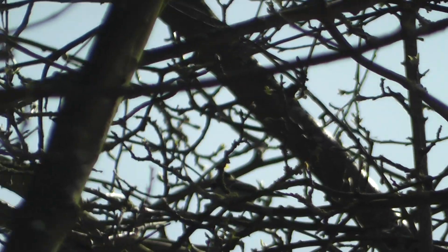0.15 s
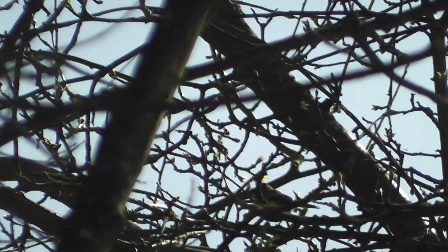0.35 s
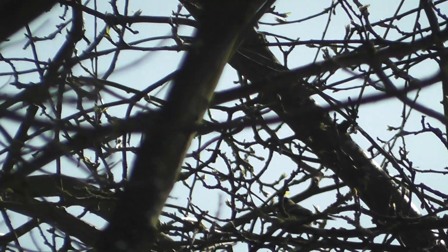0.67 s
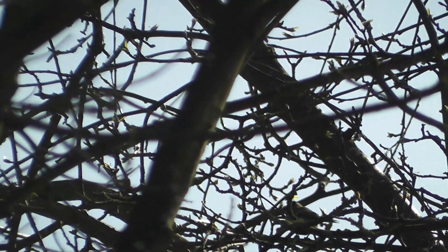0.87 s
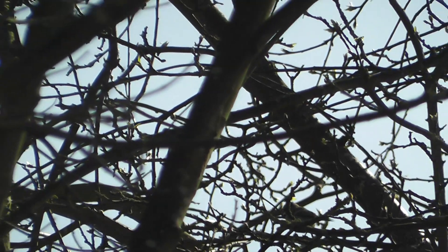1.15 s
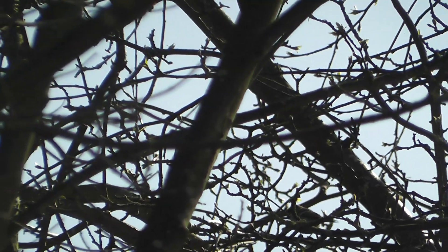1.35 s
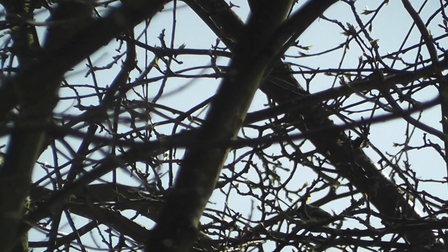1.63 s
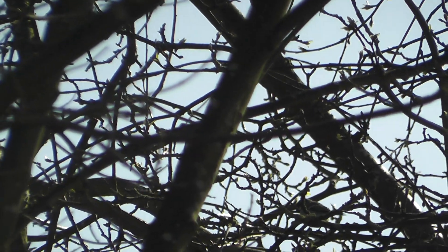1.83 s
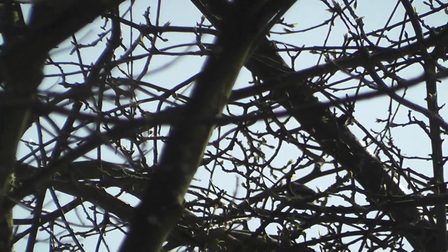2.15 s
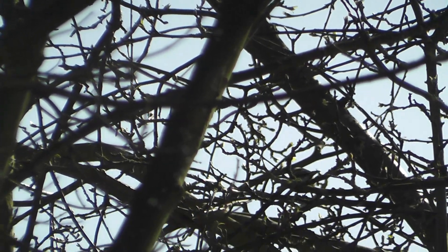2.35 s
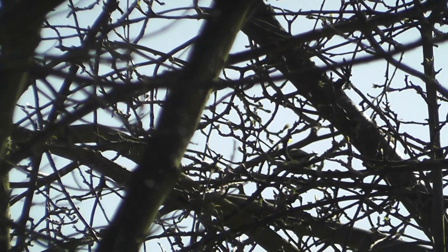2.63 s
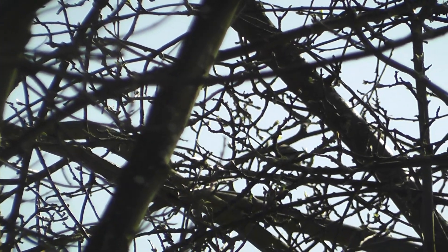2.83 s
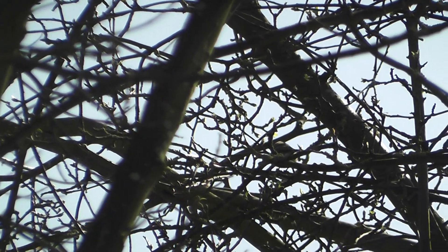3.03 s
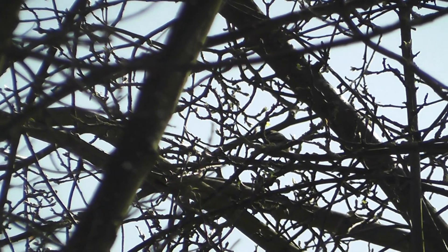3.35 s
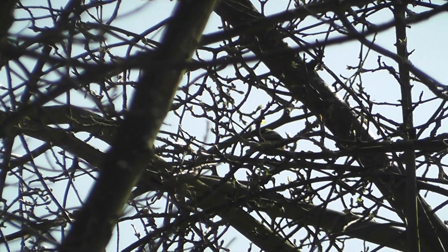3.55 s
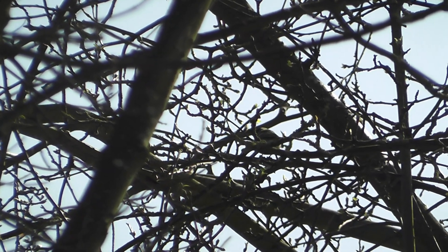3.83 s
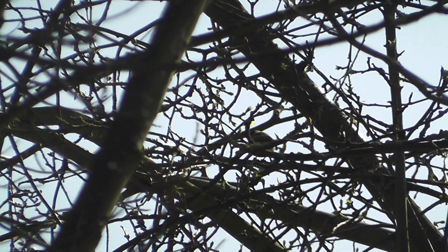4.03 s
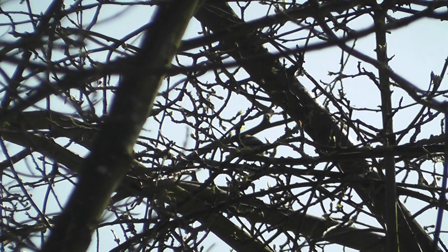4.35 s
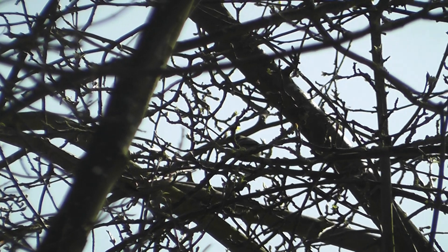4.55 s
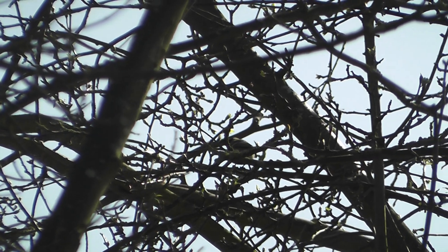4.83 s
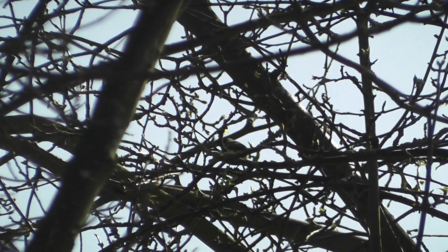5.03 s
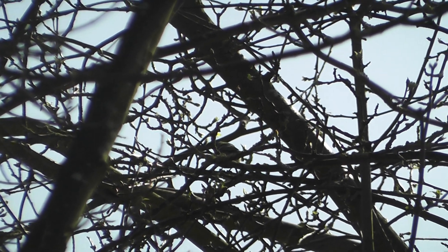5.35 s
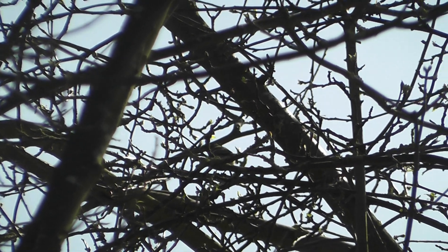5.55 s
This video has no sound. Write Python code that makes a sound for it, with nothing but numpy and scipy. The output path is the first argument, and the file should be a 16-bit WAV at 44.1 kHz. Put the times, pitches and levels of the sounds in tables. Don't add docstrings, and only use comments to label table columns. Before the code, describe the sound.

Among bare trees, a small songbird whistles alternating throbbing high and steady low notes for about a second and a half. A nearby second bird trills, slurs, then chirps quickly and ends in a dry buzz. Faint rival whistles, twitter, a rough throat rattle and dove coos sit far behind. The first bird returns at the end. Stereo microphone at some distance, with woody echoes over a low traffic rumble.

```python
import sys
import numpy as np
from scipy import signal
from scipy.io import wavfile

SR = 44100
rng = np.random.default_rng(int(sys.argv[2]) if len(sys.argv) > 2 else 0)


def master(y):
    cut = np.clip(np.atleast_2d(y).T, -1, 1)
    pcm = np.round(cut * 32767)
    wavfile.write(sys.argv[1], SR, pcm.astype(np.int16))


def level_to_linear(level):
    exponent = np.asarray(level, float) / 20
    return 10 ** exponent


N = 250488
PAD = SR // 4
ALL = N + PAD


def rms_one(x):
    return x / np.sqrt(np.mean(x ** 2) + 1e-20)


def drift(rate_hz, size):
    r = np.exp(-2 * np.pi * rate_hz / SR)
    noise = rng.standard_normal(size + SR)
    return rms_one(signal.lfilter([1], [1, -2 * r, r * r], noise)[SR:])


def add_whistle(out, s, hz, level, overtones):
    phase = 2 * np.pi * np.cumsum(hz) / SR
    at = PAD + round(s * SR)
    tone = np.sin(phase)
    for k, db in overtones:
        tone = tone + level_to_linear(db) * np.sin(k * phase) * (k * hz < SR / 2)
    out[at:at + len(hz)] += (np.sqrt(2) * level * tone)[:ALL - at]


def glides(notes, rise, fall, overtones, late=0., sharp=0.63, sag_hz=0., burr=0., burr_hz=200., rough_db=0.):
    out = np.zeros(ALL)
    wobble = drift(27.2, ALL)
    for s, length, start_hz, end_hz, bend, db in notes:
        u = np.linspace(0, 1, round(length * SR))
        left = (np.exp(-bend * u) - np.exp(-bend)) / (1 - np.exp(-bend))
        hz = end_hz + (start_hz - end_hz) * left - sag_hz * u
        top = np.clip(rise + late * abs(np.log(end_hz / start_hz)), .02, .9)
        opening = np.sin(np.pi / 2 * np.minimum(u / top, 1))
        closing = np.sin(np.pi / 2 * np.minimum((1 - u) / fall, 1))
        add_whistle(out, s, hz, level_to_linear(db) * (opening * closing) ** sharp, overtones)
    throb = 1 + burr * np.sin(2 * np.pi * np.cumsum(burr_hz * (1 + 0.09 * wobble)) / SR)
    return out * throb * level_to_linear(rough_db * drift(140, ALL))


def trees(x, echoes, tail_db, t60, alike, pan_db):
    t = np.arange(3 * PAD) / SR
    decay = level_to_linear(-60 * t / t60) * (1 - np.exp(-t / 0.0011))
    mid, side = rng.standard_normal((2, len(t))) * decay
    share = np.clip(alike, 0, 1)
    answer = np.sqrt(1 + share) * mid + np.sqrt(1 - share) * side * [[1], [-1]]
    answer *= level_to_linear(tail_db) / np.sqrt(np.sum(answer ** 2) / 2)
    answer[:, 0] += 1
    for delay, db in echoes:
        answer[:, round(delay * SR)] += level_to_linear(db)
    heard = signal.fftconvolve(x[None], answer, axes=1)[:, PAD:ALL]
    return heard * level_to_linear([[pan_db / 2], [-pan_db / 2]])


def main_singer():
    # delay in seconds, level in dB.
    close_echo = [(.0045, -37)]
    high = glides(high_notes(), rise=0.16, fall=0.68, sharp=.7, overtones=[(2, -34.5), (3, -36.0)],
                  sag_hz=225.0, burr=0.64, burr_hz=242.3, rough_db=2.5)
    return (trees(low_notes(), [], tail_db=-12.0, t60=0.75, alike=0.67, pan_db=2.0)
            + trees(high, close_echo, tail_db=-1.5, t60=0.48, alike=0.95, pan_db=1.0))


def high_notes(delay_s=0., gain_db=0.):
    # start in seconds, level in dB, pitch it settles on in Hz.
    sung_high = [
        (-.128, -34.5, 5347),
        (.362, -37, 5376),
        (0.849, -36, 5325),
        (1.357, -36.5, 5307),
        (4.848, -39.5, 5257),
        (5.316, -35.5, 5373),
    ]
    length_s, start_hz, bend = .07, 6850, 17
    return [(s + delay_s, length_s, start_hz, hz, bend, db + gain_db) for s, db, hz in sung_high]


def low_notes():
    # start in seconds, pitch in Hz, level in dB, echo delay in seconds, echo level in dB.
    sung_low = [
        (0.107, 3928, -35, .151, -42),
        (0.596, 3923, -34.5, 0.11, -36),
        (1.097, 3972, -36, 0.14, -40),
        (4.607, 3892, -40, 0.15, -48),
        (5.065, 3904, -35, .116, -34.5),
        (5.535, 3923, -36, .16, -36),
    ]
    # second partial in dB, third partial in dB, level change as the head turns in dB per second.
    beak_aim = [(-38, -35.5, 28), (-29, -36.5, -85), (-35, -38.5, 49), (-42, -39, -11), (-33.5, -38, -5),
                (-33.5, -38, -7)]
    waver_db, waver_hz = 1.8, 18
    low, waver = np.zeros(ALL), drift(35, ALL)
    for (s, *note), (*partials_db, turn_db) in zip(sung_low, beak_aim):
        hz, level = low_note(*note, turn_db)
        sway = np.resize(waver[PAD + round(s * SR):], len(hz))
        add_whistle(low, s, hz - waver_hz * sway, level, list(zip((2, 3), partials_db)))
    return low * level_to_linear(waver_db * waver)


def low_note(hz, db, echo_s, echo_db, turn_db):
    attack_s, onset_db = 0.039, -19
    scoop_hz, scoop_s, climb_hz_per_s = 205, 0.0136, 401
    cancel_db, cancel_s = -22, .009
    hold_s, fade_db_per_s, end_s = 0.034, 234, .22
    t = np.arange(0, end_s, 1 / SR)
    after = t - echo_s
    pitch = hz + scoop_hz * np.exp(-t / scoop_s) + climb_hz_per_s * np.where(t < echo_s, t, after)
    sung = db + turn_db * (t - echo_s / 2) + onset_db * np.maximum(1 - t / attack_s, 0)
    echo = echo_db - fade_db_per_s * np.maximum(after - hold_s, 0)
    level = np.where(t < echo_s, sung, echo) + cancel_db * np.exp(-(after / cancel_s) ** 2)
    edge = np.clip(np.minimum(t, end_s - t) / .006, 0, 1)
    return pitch, edge * level_to_linear(level)


def late_echo():
    again = high_notes(delay_s=.131, gain_db=-10.5)
    line = glides(again, rise=.12, fall=0.47, overtones=[], sag_hz=206.0, rough_db=2.5)
    return trees(line, [], tail_db=-15.0, t60=0.43, alike=1.0, pan_db=-0.5)


def second_singer():
    # delay in seconds, level in dB.
    trunk_echoes = [
        (.0075, -1.5),
        (0.0208, -5.5),
    ]
    song = glides(trill_syllables() + chirps(), rise=.42, late=.15, fall=.4, sharp=1.3,
                  overtones=[(2, -36.5)], rough_db=3.5)
    return (trees(song + burred_slur(), trunk_echoes, tail_db=-0.5, t60=0.38, alike=0.92, pan_db=2.5)
            + trees(closing_buzz(), trunk_echoes, tail_db=5.5, t60=0.29, alike=0.86, pan_db=1.0))


def trill_syllables():
    # delay in seconds, length in seconds, start in Hz, end in Hz, bend, level in dB.
    syllable = [
        (.001, .008, 8100, 5740, .6, -11),
        (0.017, .022, 4320, 5340, 1.2, -2.5),
        (0.034, 0.024, 4300, 2730, 1.1, -4),
    ]
    lead_syllable = [
        (.001, 0.0177, 8070, 6110, 1.5, -10),
        (0.02, 0.023, 4240, 5010, 1.5, 2.5),
        (0.042, .028, 3900, 2600, .6, -0.5),
    ]
    # start in seconds, level in dB.
    trill_times = [(0.206, -43.5), (0.3, -43), (.393, -42), (0.48, -40.5), (0.572, -41), (0.663, -42),
                   (0.753, -42.5)]
    lead_times = [(3.935, -49.5), (4.031, -47.5)]
    notes = []
    for times, parts in ((trill_times, syllable), (lead_times, lead_syllable)):
        for s, db in times:
            notes += [(s + delay, *shape, db + part_db) for delay, *shape, part_db in parts]
    return notes


def chirps():
    # start in seconds, length in seconds, start in Hz, end in Hz, level in dB.
    strokes = [(0.122, 0.047, 2720, 4000, -49.5), (0.144, 0.039, 4350, 5310, -40.5),
               (2.397, 0.02, 2990, 4600, -44.5), (2.509, .022, 2970, 3818, -45.5),
               (2.597, 0.015, 2960, 4810, -43), (2.82, 0.0317, 4180, 5070, -44),
               (3.12, 0.021, 2866, 3716, -48.5), (3.232, 0.012, 2300, 5750, -42),
               (3.318, .037, 2990, 4810, -44), (3.454, 0.033, 5300, 5840, -47.5),
               (3.515, 0.0091, 2500, 5150, -43), (3.558, 0.041, 2590, 4864, -42),
               (3.864, .032, 2930, 5540, -42)]
    # start in seconds, pitch in Hz, level in dB.
    pips = [
        (0.042, 3100, -52.5),
        (2.917, 2800, -60.5),
        (3.021, 3174, -57.5),
        (3.757, 2970, -56),
    ]
    # length in seconds, start as share of pitch, bend.
    pip_length, pip_start, pip_bend = (0.0259, .83, 2.36)
    # start in seconds, pitch in Hz, level in dB.
    hooks = [
        (1.989, 7130, -67.5),
        (2.126, 6800, -64.5),
        (2.304, 7010, -62.5),
        (2.448, 6620, -64),
    ]
    # delay in seconds, length in seconds, start and end as shares of pitch, level in dB.
    hook_parts = [
        (0, .02, 0.79, 1.01, 3.5),
        (.003, 0.028, 1.06, 1.13, 0),
        (0.037, .036, 1.01, .995, 4),
    ]
    # start in seconds, length in seconds, pitch in Hz, level in dB.
    held = [(0.084, 0.031, 6790, -52.5), (.861, 0.035, 7230, -53), (.864, 0.072, 7900, -63),
            (1.68, 0.034, 5680, -72), (2.346, 0.044, 8300, -75), (2.694, 0.041, 5675, -50),
            (2.699, .021, 7350, -58.5), (2.764, 0.058, 3010, -62), (2.798, 0.076, 5810, -56.5),
            (3.177, 0.019, 6250, -53.5), (3.372, 0.029, 8600, -70), (3.384, 0.023, 6600, -48.5),
            (3.458, 0.011, 6720, -46), (3.609, 0.053, 8200, -64), (3.627, 0.044, 6390, -48),
            (3.702, 0.028, 5290, -41.5), (3.707, 0.025, 6900, -53.5), (3.815, .016, 6930, -50)]
    # start in seconds, start in Hz, end in Hz, level in dB.
    flicks = [(.93, 7150, 6300, -52), (1.484, 4660, 3260, -56), (1.74, 4050, 3030, -58),
              (2.544, 6500, 5500, -63), (3.746, 3350, 1690, -67)]
    drops = [(.002, 7400, 6400, -54.5), (.091, 3560, 2655, -51), (1.195, 8600, 7570, -59.5),
             (1.233, 8520, 7900, -65), (1.345, 4150, 2960, -50), (1.529, 4060, 3800, -53),
             (1.588, 3480, 2910, -56.5), (1.646, 5220, 3460, -59), (1.722, 4920, 4550, -54),
             (3.172, 8406, 7360, -65.5), (3.195, 6800, 6400, -64), (3.388, 8400, 8000, -70)]
    sags = [(.951, 5500, 4430, -46), (1.213, 7760, 7140, -71), (1.456, 3200, 2730, -60)]
    notes = [(*stroke, 0.89, db) for *stroke, db in strokes]
    notes += [(s, pip_length, pip_start * hz, hz, pip_bend, db) for s, hz, db in pips]
    for s, hz, db in hooks:
        notes += [(s + delay, length, start * hz, end * hz, 3.1, db + part_db)
                  for delay, length, start, end, part_db in hook_parts]
    notes += [(s, length, .97 * hz, hz, 0.79, db) for s, length, hz, db in held]
    for rows, length_s in ((flicks, 0.0114), (drops, 0.02), (sags, .044)):
        notes += [(s, length_s, start, end, .7, db) for s, start, end, db in rows]
    return notes


def burred_slur():
    # start in seconds, length in seconds, start in Hz, end in Hz, bend, level in dB.
    long_slur = [
        (.995, .21, 4004, 3034, 1.8, -45.5),
    ]
    return glides(long_slur, rise=0.037, fall=1.0, overtones=[(4.6, -38)], burr=0.66, burr_hz=196.2, rough_db=2.5)


def closing_buzz():
    # time in seconds, level in dB.
    buzz_level = [
        (4.132, -54.5),
        (4.16, -49),
        (4.27, -49),
        (4.4, -50.5),
        (4.51, -57),
    ]
    sweeps_per_s = 35.6
    length_s, start_hz, end_hz, bend = .019, 9000, 1900, .9
    beats = np.arange(buzz_level[0][0], buzz_level[-1][0], 1 / sweeps_per_s)
    beats = beats + 0.0003 * rng.standard_normal(len(beats))
    sweeps = [(s, length_s, start_hz, end_hz, bend, np.interp(s, *np.transpose(buzz_level))) for s in beats]
    return glides(sweeps, rise=0.51, fall=0.57, overtones=[(2, -31)], sharp=1.8,
                  burr=0.3, burr_hz=1172.0, rough_db=1.5)


def far_birds():
    return (trees(far_rival(), [], tail_db=3.0, t60=0.56, alike=0.95, pan_db=3.0)
            + trees(far_twitter(), [], tail_db=4.5, t60=1.0, alike=0.8, pan_db=1.5)
            + trees(dove() + throat_rattle(), [], tail_db=-3.0, t60=1.0, alike=0.37, pan_db=1.5))


def far_rival():
    # start in seconds, length in seconds, pitch in Hz, level in dB.
    whistles = [(0.852, 0.065, 4300, -65), (1.288, 0.12, 4300, -68), (1.564, 0.088, 3800, -81),
                (1.631, 0.27, 3070, -73), (1.701, 0.12, 3380, -69), (1.77, 0.13, 4290, -66.5),
                (1.797, 0.11, 6000, -93), (1.88, 0.076, 4500, -76), (1.99, 0.2, 3800, -76),
                (2.252, 0.17, 4290, -68.5), (2.329, 0.059, 4550, -74), (2.49, 0.11, 3790, -86),
                (2.775, 0.15, 4243, -65), (2.823, 0.09, 3017, -68), (2.985, 0.16, 3770, -74),
                (3.007, 0.23, 4250, -89), (4.839, 0.082, 3760, -72)]
    notes = [(s, length, hz * 1.008, hz, 6.0, db) for s, length, hz, db in whistles]
    rival = glides(notes, rise=.15, fall=0.19, overtones=[(2, -38.5)], rough_db=4.5)
    return rival * level_to_linear(5.0 * drift(29, ALL))


def far_twitter():
    # start in seconds, start in Hz, end in Hz, level in dB.
    twitters = [(0.156, 3670, 2900, -67), (0.988, 7300, 6160, -66), (1.332, 3380, 4010, -57),
                (1.375, 2950, 3540, -58.5), (1.408, 4230, 3890, -72), (1.433, 4440, 3360, -62),
                (1.51, 3850, 3350, -72), (1.554, 2770, 2970, -61.5), (1.563, 4185, 3650, -64),
                (1.606, 4030, 3840, -69), (2.6, 6130, 5300, -71.5)]
    notes = [(s, 0.0257, start, end, 1, db) for s, start, end, db in twitters]
    return glides(notes, rise=0.11, fall=0.091, overtones=[], rough_db=7.5)


def dove():
    # start in seconds, length in seconds, start in Hz, end in Hz, level in dB.
    coos = [
        (2.86, .47, 452, 495.3, -62),
        (3.38, 0.49, 470, 526.7, -60.5),
        (3.88, 0.382, 523, 496.4, -61),
    ]
    notes = [(*coo, 2.44, db) for *coo, db in coos]
    return glides(notes, rise=0.14, fall=0.99, overtones=[(1.8, -37)]) * level_to_linear(4.4 * drift(31, ALL))


def throat_rattle():
    # start in seconds, length in seconds, level in dB.
    bursts = [
        (1.873, 0.065, -56.5),
        (1.955, 0.064, -56.5),
        (2.027, 0.075, -55.5),
    ]
    # centre in Hz, width in Hz, level in dB.
    throat = [
        (1220, 200, -9.5),
        (2150, 750, 0),
        (2500, 610, -4),
    ]
    gate = np.zeros(ALL)
    for s, length, db in bursts:
        at, size = PAD + round(s * SR), round(length * SR)
        gate[at:at + size] = level_to_linear(db) * np.hanning(size) ** 0.23
    breath = rng.standard_normal(ALL) * level_to_linear(0.45 * drift(150, ALL))
    rattle = 0
    for hz, width_hz, db in throat:
        r = np.exp(-np.pi * width_hz / SR)
        ring = signal.lfilter([1, 0, -1], [1, -2 * r * np.cos(2 * np.pi * hz / SR), r * r], breath)
        rattle = level_to_linear(db) * ring - rattle
    return gate * rms_one(rattle)


def at_hz(points, hz):
    return np.interp(np.log(hz), np.log(np.array(points)[:, 0]), np.array(points)[:, 1])


def background(patchy_db, pan_db):
    # frequency in Hz, level in dB per Hz.
    floor_tone = [(25, -20), (64, -6), (241, 0.7), (560, -3.5), (1080, -9), (2390, -23), (4800, -30),
                  (15000, -39.5)]
    # time in seconds, level in dB.
    floor_level = [(0.0, -52.5), (0.81, -50.5), (1.6, -51.5), (2.06, -51), (2.7, -52.5), (3.88, -50.5),
                   (4.19, -52), (5.27, -51.5), (5.68, -52)]
    # frequency in Hz, left-right likeness from -1 to 1.
    likeness = [(25, .01), (50, 1), (100, 0.2), (400, 0.47), (1200, 0.028), (4000, 0.57), (9000, 0.98),
                (14000, .2)]
    # frequency in Hz, level in dB.
    machine_hums = [
        (526, -68),
        (841, -71),
        (1060, -70),
        (2523, -77.5),
        (14050, -93.5),
    ]
    chorus_hz, chorus_octaves, chorus_db = 3687, 0.15, 15.5
    out = 0
    edges = 22 * 2 ** (np.arange(29.5) / 3)
    white = rng.standard_normal((2, 2, ALL))
    t = np.arange(N) / SR
    for k, (low, high) in enumerate(zip(edges, edges[1:])):
        centre = np.sqrt(low * high)
        band = signal.butter(2, [low, high], "band", fs=SR, output="sos")
        mid, side = signal.sosfilt(band, white[k % 2])[:, PAD:]
        alike = np.clip(at_hz(likeness, centre), -1, 1)
        hump = chorus_db * np.exp(-(np.log2(centre / chorus_hz) / chorus_octaves) ** 2)
        gain = level_to_linear(at_hz(floor_tone, centre) + hump + patchy_db * drift(3.2, N))
        out = out + gain * (np.sqrt(1 + alike) * mid + np.sqrt(1 - alike) * side * [[1], [-1]])
    hums = sum(level_to_linear(db + 2.0 * drift(1.6, N)) * np.sin(2 * np.pi * hz * t) for hz, db in machine_hums)
    level = level_to_linear(np.interp(t, *np.transpose(floor_level)))
    return level * rms_one(out) * level_to_linear([[pan_db / 2], [-pan_db / 2]]) + hums


def scene():
    birds = main_singer() + late_echo() + second_singer() + far_birds()
    return birds + background(patchy_db=1.4, pan_db=0.4)


def band_limit(x):
    return signal.sosfilt(signal.butter(12, 15930, fs=SR, output="sos"), x)


def record(dry):
    return band_limit(dry)


dry = scene()
out = record(dry)
master(out)
```